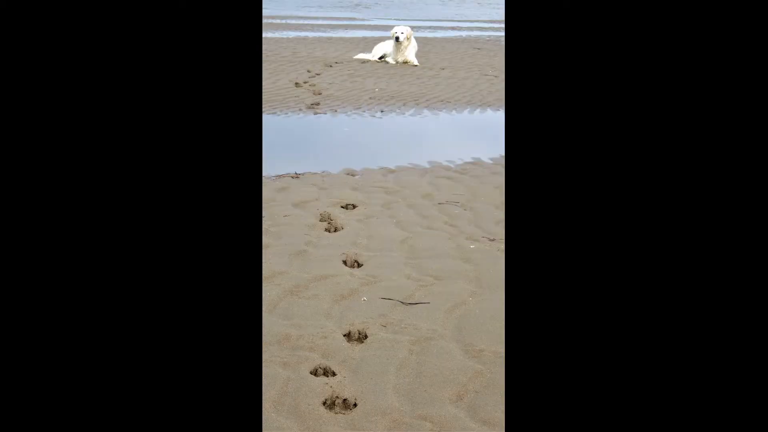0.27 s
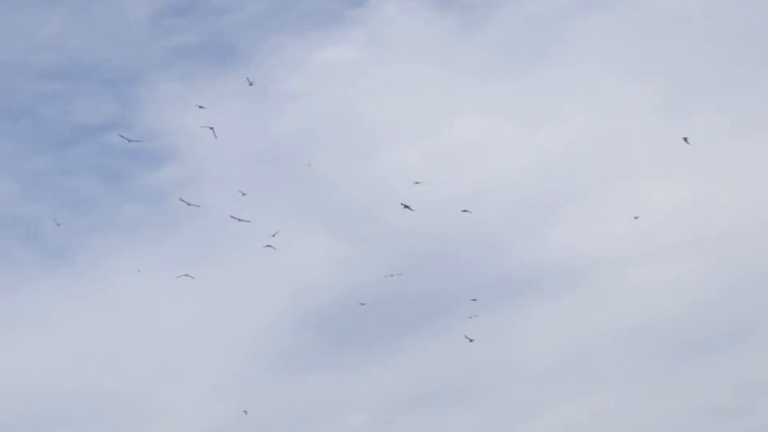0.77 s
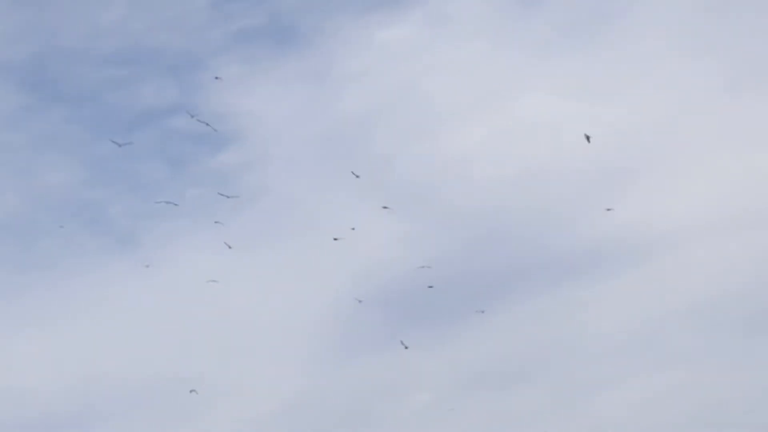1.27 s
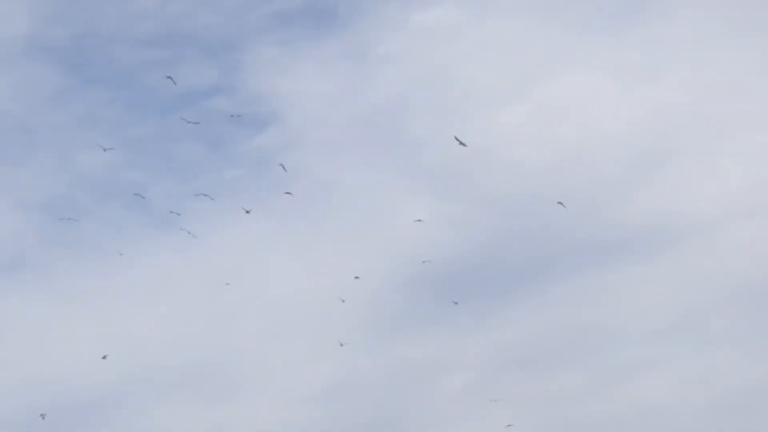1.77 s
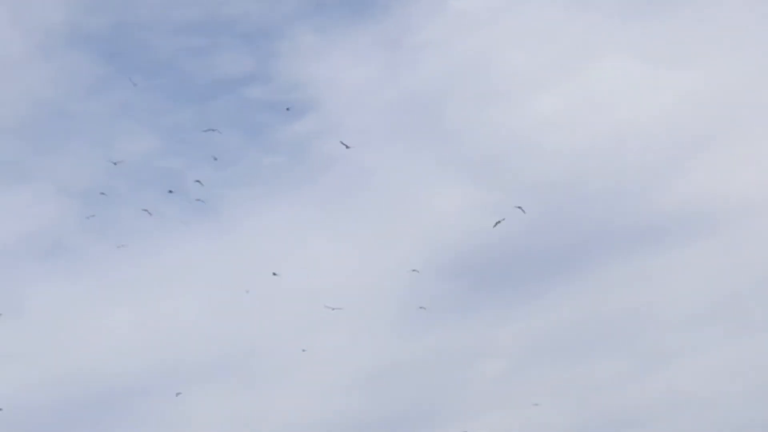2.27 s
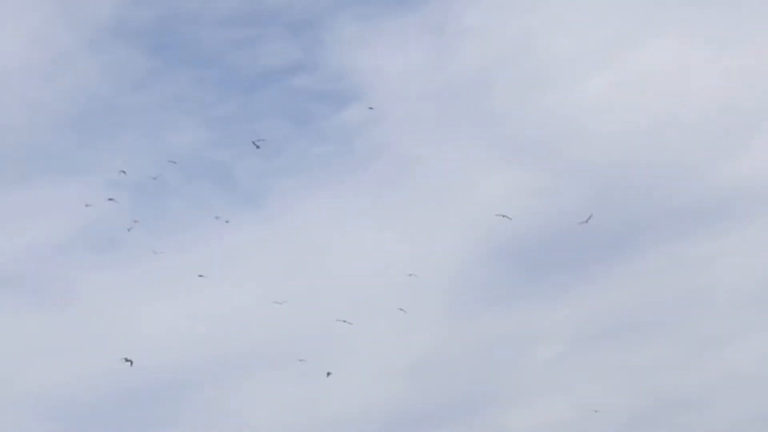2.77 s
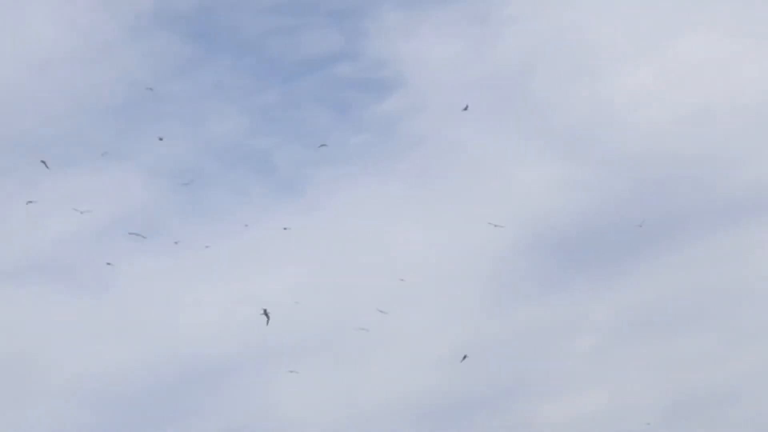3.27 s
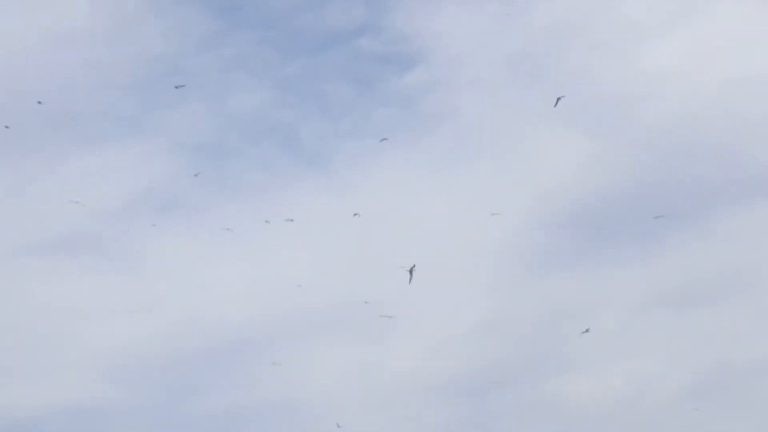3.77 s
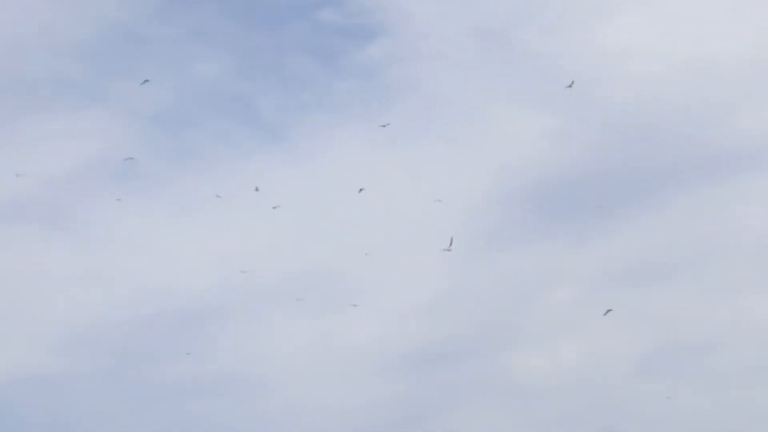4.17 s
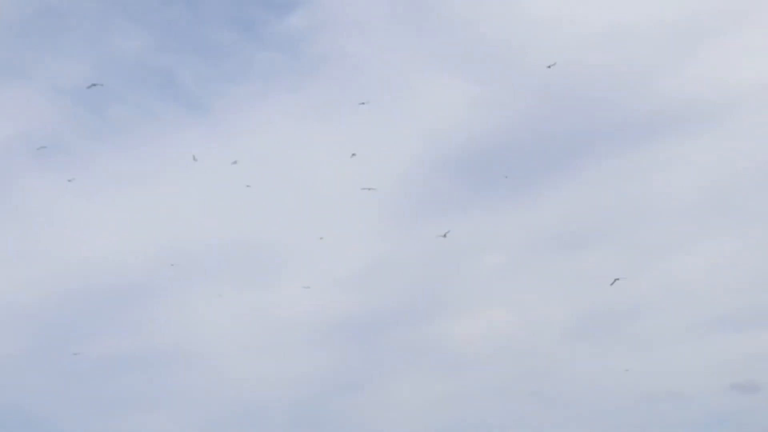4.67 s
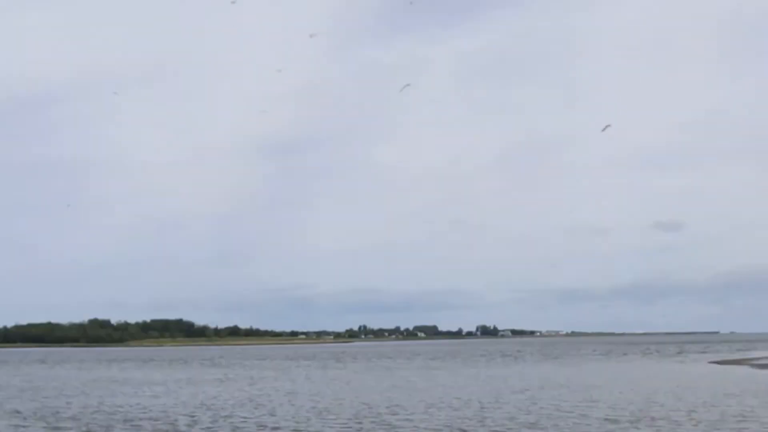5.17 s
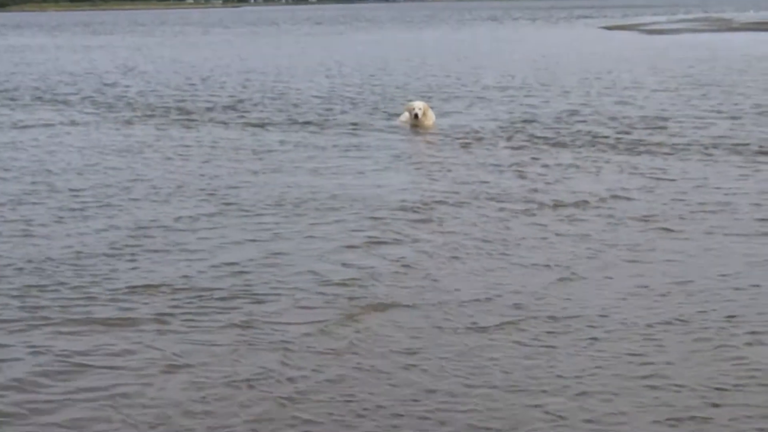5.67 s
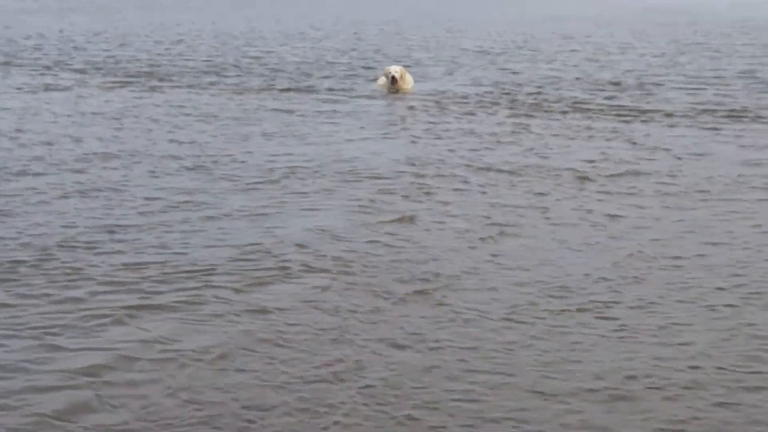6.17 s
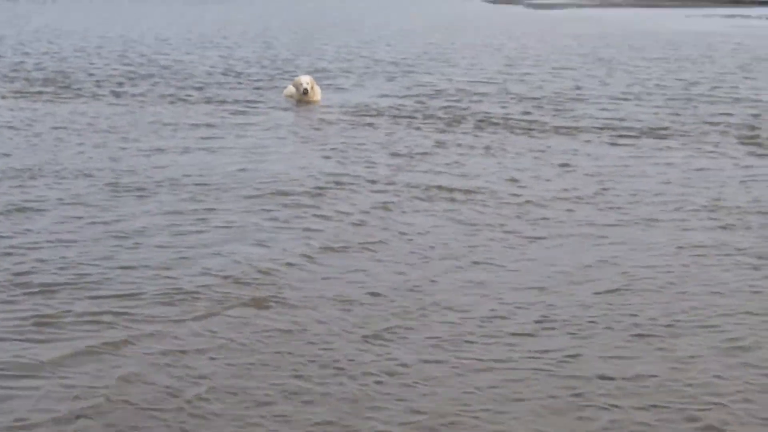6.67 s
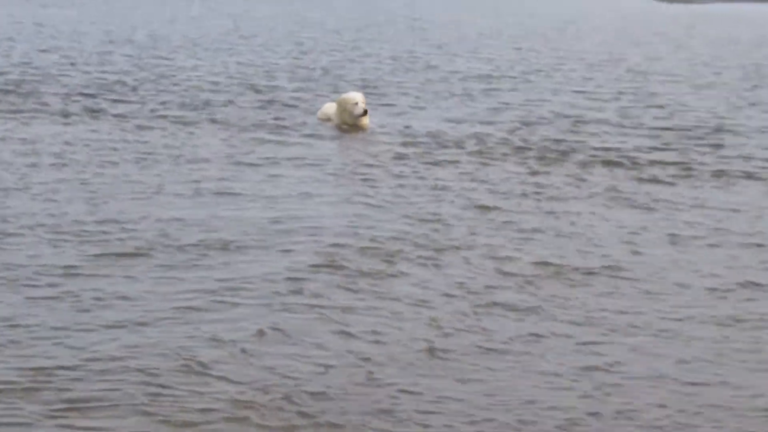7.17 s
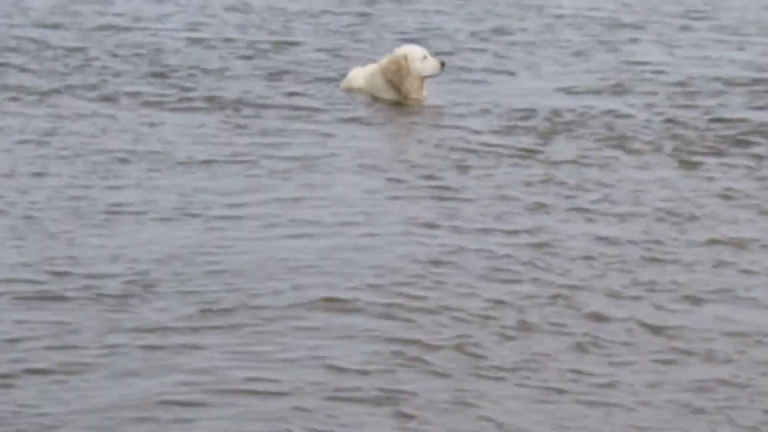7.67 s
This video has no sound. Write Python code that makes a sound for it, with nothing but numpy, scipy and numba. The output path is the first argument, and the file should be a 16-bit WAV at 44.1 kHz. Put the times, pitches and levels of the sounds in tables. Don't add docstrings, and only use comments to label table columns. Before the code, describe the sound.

Terns cry and yap over light wind and hiss, then legs wade through shallow water with gurgling bubbles, crackling foam and one hard clipped slap.

```python
import sys
import numpy as np
from scipy import signal
from scipy.fft import rfft, irfft
from scipy.io import wavfile
from scipy.ndimage import uniform_filter1d
from numba import njit

SR = 44100
rng = np.random.default_rng(int(sys.argv[2]) if len(sys.argv) > 2 else 0)


def amplitude_ratio(level_db):
    exponent = np.asarray(level_db, float) / 20
    return 10 ** exponent


def materialize(psi):
    bounded = np.clip(np.atleast_2d(psi).T, -1, 1)
    quanta = np.round(bounded * 32767).astype(np.int16)
    wavfile.write(sys.argv[1], SR, quanta)


N = 349272
T = np.arange(N) / SR

# time in seconds, level in dB.
WIND = [(.36, -36.5), (1.31, -38.5), (1.8, -39.5), (2.1, -39), (3.3, -37.5), (4.6, -38.5), (4.8, -29.5),
        (5.55, -32), (5.7, -37.5), (6.199, -27.5), (6.451, -22.5), (6.76, -34.5), (7.01, -44), (7.92, -40)]
# frequency in Hz, density in dB per Hz.
AIR_COLOUR = [(20, -4), (190, -5), (500, -3.5), (2400, -15.5), (4500, -21.5), (6500, -12.5), (14500, -10.5),
              (16500, -14)]
# start in seconds, length in seconds, pitch in Hz, level in dB, final fall as a share.
KIPS = [(0.375, 0.056, 1820, -21.5, 0.33), (0.985, 0.014, 1875, -27, 0.28), (1.361, 0.059, 1927, -20, 0.24),
        (2.009, 0.015, 1900, -29.5, 0.63), (2.369, 0.06, 1896, -22, 0.29),
        (3.308, 0.064, 1854, -22.5, 0.31), (3.658, 0.016, 1994, -25, 0.088), (4.145, 0.054, 1838, -26, 0.3),
        (4.732, 0.0065, 1920, -27.5, .1), (4.875, 0.041, 1868, -26.5, 0.18),
        (5.331, 0.013, 1980, -27.5, 0.077), (6.93, 0.067, 1910, -39.5, .1),
        (6.761, 0.057, 1860, -26.5, 0.1), (7.314, 0.054, 1960, -37.5, 0.2),
        (7.699, 0.042, 1930, -28.5, .15)]
# start in seconds, length in seconds, pitch in Hz, level in dB, final fall as a share.
PEEPS = [
    (2.25, 0.028, 2300, -29, 0.049),
]
KIP_HARMONICS = [-13.5, 0.5, -5, -18, -25, -24]
PEEP_HARMONICS = [-5, -17]
# throb rate in Hz and a throb start in seconds, then rows of
# time in seconds, pitch in Hz, level in dB, roughness from 0 to 1, brightness in dB.
CRIES = [
    ((52, .509), [(.35, 1480, -25.5, 0.24, -5.5), (.44, 1425, -24, 0.27, -13), (.49, 1395, -25, 0.2, -14), (.51, 1200, -30, 0.6, -7), (.63, 1185, -31, 0.65, -9), (.75, 1200, -31, 0.6, -8), (.9, 1215, -32, 0.6, -9)]),
    ((88, 1.84), [(1.825, 1185, -54, .3, 12), (1.95, 1160, -54, .35, 12), (2.04, 1100, -58, .4, 12), (2.14, 1000, -54, .3, 12)]),
    ((70, 1.84), [(1.83, 2360, -37, .09, -14), (1.95, 2320, -37, .1, -14), (2.03, 2330, -43, .14, -14), (2.12, 2300, -48, .2, -14)]),
    ((52.8, 5.203), [(5.08, 1520, -38, .06, -17), (5.17, 1420, -31, .06, -17), (5.22, 1375, -27, .06, -17), (5.28, 1390, -30, .06, -17), (5.33, 1400, -38, .1, -17)]),
    ((52, .395), [(.36, 1230, -40, .6, -8), (.45, 1190, -38, .6, -8), (.52, 1150, -42, .6, -8)]),
    ((52.6, 1.996), [(1.89, 1545, -40, .06, -17), (2.0, 1450, -30, .06, -17), (2.08, 1425, -29, .06, -17), (2.11, 1430, -37, .15, -12), (2.15, 1270, -37, .15, -12)]),
]
# throb rate in Hz and a throb start in seconds, then rows of
# time in seconds, pitch in Hz, level in dB, roughness from 0 to 1, brightness in dB.
CHORUS = [
    ((59, 2.2), [(2.43, 1168, -42.5, 0.31, 2), (2.53, 1140, -51.5, 0.26, 10)]),
    ((43, 3), [(2.67, 1714, -38, 0.02, -5), (2.78, 1675, -30, 0.13, -13), (2.83, 1640, -38, 0.1, -14)]),
    ((48, 3), [(2.82, 3020, -42, 0.09, -20), (2.87, 3040, -37, 0.07, -20), (3.02, 3300, -48, .03, -20)]),
    ((65, 2.6), [(2.6, 1168, -47, 0.465, 2), (2.75, 1120, -45, 0.44, 8), (2.95, 1147, -51, 0.48, 4.9), (3.12, 1182, -44, 0.63, 7)]),
    ((54.6, 3.062), [(2.58, 1217, -42, 0.58, -9), (2.66, 1113, -40.5, 0.61, 3.5), (2.83, 1043, -41, 0.57, 4.5), (3.05, 1102, -37, 0.54, 0.5), (3.14, 1113, -35.5, 0.64, -7), (3.23, 1148, -38.5, 0.72, -9), (3.28, 1180, -33, 0.61, 0), (3.65, 1171, -39.5, 0.78, -13)]),
]
CRY_HARMONICS = [-19, 0, 0, -4, -12]
# start in seconds, length in seconds, first pitch in Hz, top level in dB, throb rate in Hz.
TRILLS = [
    (7.25, .11, 1400, -41, 52),
    (4.95, 0.14, 2100, -35, 49.6),
    (3.67, 0.26, 1545, -33, 52.3),
    (6.2, 0.12, 1715, -34, 43),
    (5.88, 0.087, 1734, -33, 63),
    (7.42, 0.21, 2340, -38.5, 24),
    (7.72, 0.13, 2330, -34.5, 46.4),
]
# start in seconds, push in dB, push length in seconds, ring in dB.
SLAPS = [
    (0.582, -41, 0.0072, -21.5),
    (3.417, -13, 0.011, -12.5),
    (4.752, -15.5, 0.006, -27),
    (6.222, -8, 0.011, -24),
    (6.303, -17, 0.0096, -16),
    (6.821, -8, 0.0066, 3),
    (7.904, -57, 0.006, -11),
]
# start in seconds, level in dB, length in seconds.
CRACKS = [
    (6.8243, 7, 0.0021),
]
# time in seconds, peak in dB.
TICKS = [(2.432, -22), (3.894, -25), (4.302, -29), (4.352, -24), (3.589, -26), (3.766, -28), (4.2667, -28),
         (4.4088, -24), (4.436, -19.5), (4.703, -24), (4.7994, -20), (5.202, -14.5), (5.2656, -26),
         (5.281, -16), (5.533, -30), (5.687, -20), (5.807, -24), (6.006, -22.5), (6.248, -23),
         (6.4735, -36), (6.4963, -19), (6.5454, -21), (6.601, -19), (6.7303, -21), (6.7664, -12.5),
         (6.8227, -28), (7.235, -23), (7.4857, -20.5), (7.631, -21), (7.7634, -18), (7.9097, -18.5)]
# start in seconds, length in seconds, splash in dB, spray in dB.
STRIDES = [(5.72, 0.029, -40, -56), (5.923, 0.03, -36, -53), (6.118, 0.045, -38, -58),
           (4.6, 0.052, -39, -62), (3.455, 0.14, -32.5, -46), (3.581, 0.15, -34, -50.5),
           (3.749, 0.18, -33, -45.5), (3.949, 0.075, -38.5, -51), (4.06, 0.24, -42, -53.5),
           (4.317, 0.19, -36, -43), (4.496, 0.15, -38, -59), (4.706, 0.036, -32, -41),
           (4.773, 0.096, -29, -45.5), (4.917, 0.14, -25, -41), (5.108, 0.075, -35, -39.5),
           (5.208, 0.1, -31.5, -39.5), (5.324, .17, -33, -43.5), (5.533, 0.059, -28.5, -42.5),
           (5.611, 0.095, -23, -42), (5.773, 0.15, -27.5, -40.5), (5.974, 0.15, -30.5, -47),
           (6.189, 0.23, -32.5, -40), (6.444, 0.063, -32.5, -44), (6.499, 0.098, -22, -42.5),
           (6.627, 0.19, -23, -41.5), (6.873, 0.15, -33, -53), (7.06, 0.22, -37.5, -47),
           (7.349, 0.061, -33.5, -47.5), (7.443, 0.21, -32.5, -42.5), (7.686, 0.04, -27, -45),
           (7.764, 0.12, -33, -42.5)]
# start in seconds, length in seconds, level in dB.
SLOSHES = [(3.417, 0.013, -25), (3.594, 0.36, -36.5), (3.85, 0.29, -33), (4.301, 0.26, -26.5),
           (4.596, 0.076, -23.5), (4.79, 0.11, -32), (5.04, 0.038, -23), (5.106, 0.19, -27.5),
           (5.32, 0.095, -26), (5.453, 0.14, -20), (5.663, 0.034, -22), (5.81, 0.1, -25.5),
           (5.986, 0.13, -15.5), (6.184, 0.2, -32), (6.473, 0.099, -12), (6.653, 0.28, -36),
           (7.214, 0.02, -38.5), (7.39, 0.027, -43), (7.507, 0.31, -33.5), (7.898, .02, -22.5), ]
# start in seconds, peak in dB, pitch in Hz.
GULPS = [(4.335, -16, 507), (4.39, -21, 453), (4.63, -16, 400), (5.064, -10.5, 430), (6.012, -9, 338),
         (6.06, -4.5, 320), (6.084, -5.5, 430), (6.11, -13, 381), (6.575, -4, 417), (7.905, -14, 394),
         (3.423, -10, 301), (3.741, -4, 567), (3.888, -11.5, 625), (4.198, -17, 380), (4.442, -16.5, 405),
         (4.606, -15.5, 368), (4.757, -1, 352), (5.032, -12, 342), (5.155, -18, 270), (5.228, -13.5, 402),
         (5.334, -13, 352), (5.392, -10, 450), (5.465, -12.5, 379), (5.553, -3, 390), (5.589, -4.5, 490),
         (5.844, -13, 530), (5.993, -7, 358), (6.041, -2, 300), (6.142, -13, 420), (6.216, -9, 421),
         (6.267, -14, 393), (6.301, -4, 350), (6.343, -7, 445), (6.479, -14, 380), (6.499, -2, 353),
         (6.508, -5, 372), (6.53, -5, 400), (6.559, -6.5, 464), (6.763, -12.5, 513), (6.826, 2, 435),
         (6.958, -20, 517), (7.382, -16, 350)]
# start in seconds, peak in dB, pitch in Hz.
BUBBLES = [(2.97, -23.5, 1030), (3.399, -20, 1210), (3.599, -24, 624), (3.978, -19, 673),
           (4.709, -19.5, 582), (4.805, -15, 840), (4.938, -12.5, 1020), (5.099, -25, 743),
           (5.228, -13, 640), (5.276, -18, 750), (5.646, -16, 1020), (5.766, -14, 1130), (6.303, -17, 603),
           (6.48, -9, 665), (6.585, -13, 558), (7.245, -22, 567), (7.324, -24, 850), (7.376, -22, 910),
           (7.53, -21, 974), (3.633, -16, 860), (4.53, -15, 1020), (7.762, -22.5, 830), (4.502, -14.5, 990),
           (5.581, -8.5, 1080), (5.686, -4.5, 930), (5.791, -13.5, 1200), (5.845, -6.5, 1150),
           (6.445, -13.5, 1030), (6.552, -6.5, 930), (6.697, -9, 894), (6.759, -8, 825), (6.96, -17.5, 895),
           (7.701, -15, 900)]
# start in seconds, peak in dB, pitch in Hz.
DROPS = [(3.588, -13, 2540), (3.633, -13, 2250), (3.654, -17, 1930), (3.764, -19, 2400), (3.832, -19, 2800),
         (3.9845, -14.5, 4270), (4.05, -19, 2470), (4.199, -16, 2600), (4.422, -26, 1890),
         (4.527, -18, 1700), (4.6245, -16, 1580), (4.71, -14, 2640), (4.967, -9, 2660), (5.333, -9, 4400),
         (5.58, -17, 2170), (5.626, -14, 1850), (5.833, -19, 2090), (5.9635, -18, 2600), (6.004, -14, 2040),
         (6.067, -25, 1600), (6.219, -27, 1780), (6.446, -17, 1480), (6.495, -3.5, 4400),
         (6.548, -14, 2530), (6.91, -20, 2040), (6.959, -17, 2160), (6.979, -15, 1730), (7.003, -17, 2320),
         (7.474, -21, 2570), (7.675, -19, 2150), (7.762, -12, 2550), (7.763, -12, 3600), (7.6, -11.5, 4600),
         (7.63, -17, 1320), (3.516, -14.5, 1176), (3.54, -11, 2400), (4.198, -22, 1420),
         (4.33, -15.5, 1520), (4.825, -3, 2280), (4.851, -4.5, 1400), (4.868, -10.5, 1650),
         (4.921, -10, 1610), (5.006, -14.5, 1410), (5.249, -17, 1260), (5.369, -12.5, 2370),
         (5.432, -11, 1245), (5.541, -5, 1330), (5.753, -11, 2240), (5.828, -13, 1310), (6.578, -8.5, 1310),
         (6.67, -9, 1330), (6.736, -9, 1440), (7.113, -19.5, 1190), (7.561, -11.5, 2380),
         (7.575, -15, 2650)]
# start in seconds, peak in dB, first pitch in Hz, last pitch in Hz, length in seconds.
RISERS = [
    (3.748, -21, 619, 1706, 0.053),
    (5.544, -14, 650, 900, 0.036),
    (6.35, -19.5, 600, 900, 0.049),
    (6.59, -15, 520, 900, .04),
    (7.056, -29.5, 597, 1400, .075),
    (7.656, -25, 397, 700, 0.033),
]
# centre in Hz, width in Hz, gain in dB.
CASE = [(3150, 400, -20), (5450, 900, -5), (7800, 1100, -4), (5130, 170, -15), (5720, 300, -13),
        (4080, 100, -20), (7150, 220, -13), (8170, 35, -8)]
FADES = [.444, .655, .77, .935, 1.328, 1.421, 1.665, 1.861, 2.677, 3.138, 3.297, 3.486, 3.555, 3.79, 3.927,
         4.02, 4.392, 4.487, 5.045, 6.11, 7.551, 7.711]

CAVITY_HZ, CAVITY_T60_S = 392, .05
RISE_DB_S, SPLASH_FALL_DB_S, SPRAY_FALL_DB_S, SLOSH_FALL_DB_S = 902, 416, 312, 402
RUMBLE_DB = -16
AIR_DB = -35
RASP = 2.1
CRY_ATTACK_S, LEAN_DB = 0.018, 4.5
TRILL_EDGE_DB, TRILL_ROUGH, TRILL_BRIGHT_DB = -7, 0.077, -17
SAG_PER_S2, SAG_AT, REGAIN = 1.2, 0.46, .9
CRACKLE_DB, CRACKLE_STEEP = -5.5, 1.212
SHELF_HZ, SHELF_DB = 5100, -10
TOP_HZ, START_S = 15800, 0.3595


def unit(x):
    return x / np.sqrt(np.mean(x ** 2))


def band(x, lo_hz, hi_hz, order=2):
    return signal.sosfilt(signal.butter(order, [lo_hz, hi_hz], "band", fs=SR, output="sos"), x)


def colour(x, db_of_hz, size=4096):
    hz = np.arange(size // 2 + 1) * SR / size + 1
    c = irfft(db_of_hz(hz) * np.log(10) / 20)
    c[1:size // 2] *= 2
    c[size // 2 + 1:] = 0
    return signal.fftconvolve(x, irfft(np.exp(rfft(c))))[:N]


def walk(rate):
    k = int(SR / rate)
    held = np.repeat(rng.standard_normal(N // k + 1), k)
    return 1.35 * uniform_filter1d(uniform_filter1d(held, k), k)[:N]


def swells(s, length, db, fall_db_s):
    gain = np.zeros(N)
    for start, hold, level in zip(s, length, db):
        rise = RISE_DB_S * (T - start)
        fall = fall_db_s * (start + hold - T)
        gain += amplitude_ratio(level + np.minimum(0, np.minimum(rise, fall)))
    return gain


@njit
def ring(s, hz, t60, glide, size, rise):
    y = np.zeros(N)
    for k in range(len(s)):
        i, n, phase = int(s[k] * SR), t60[k] * SR + 2, 0.
        for j in range(min(int(n), N - i)):
            phase += 2 * np.pi * min(hz[k] * (1 + glide[k] * j / n), .45 * SR) / SR
            attack = 1 - np.exp(-j * hz[k] / (rise * SR))
            y[i + j] += size[k] * np.sin(phase) * 10 ** (-3 * j / n) * attack
    return y


def wind():
    s, db = np.transpose(WIND)
    gust = amplitude_ratio(np.interp(T, s, db))
    gust = gust + amplitude_ratio(RUMBLE_DB) * swells(*np.transpose(SLOSHES), SLOSH_FALL_DB_S)
    gust = gust * amplitude_ratio(3.6 * walk(25))
    noise = rng.standard_normal((2, N))
    rumble = unit(band(noise[0], 24.5, 102.0, order=1))
    cavity = amplitude_ratio(-8.5 + 2 * walk(29)) * unit(band(noise[1], 379, 428, order=1))
    return gust * (rumble + cavity)


def air():
    hz, db = np.transpose(AIR_COLOUR)
    hiss = unit(colour(rng.standard_normal(N), lambda f: np.interp(np.log(f), np.log(hz), db)))
    after = T - CRACKS[0][0]
    duck_db = -8 * (after > 0) * np.exp(-np.maximum(after, 0) / 1.2)
    return hiss * amplitude_ratio(AIR_DB - 1.5 + duck_db + 1.0 * walk(4.48))


def stack(hz, harmonics_db, bright_db):
    phase = 2 * np.pi * np.cumsum(hz) / SR
    return sum(amplitude_ratio(db + bright_db * (k > 1)) * np.sin((k + 1) * phase) for k, db in enumerate(harmonics_db))


def cry(throb, rows, shake):
    out = np.zeros(N)
    throb_hz, throb_s = throb
    s, *columns = np.transpose(rows)
    a, b = int(s[0] * SR), int(s[-1] * SR)
    t = T[a:b]
    flutter, grain, drift = shake[:, a:b]
    hz, db, rough, bright_db = (np.interp(t, s, c) for c in columns)
    u = ((t - throb_s) * throb_hz + .16 * rough * shake[2, ::-1][a:b]) % 1
    duty = np.minimum(.58 + .5 * rough, .9)
    gate = np.sin(np.pi * np.clip(u / duty, 0, 1)) ** .8
    sag = (.07 - .08 * rough) * (u - .35)
    pitch = hz * (1 - sag + .17 * rough * flutter + .03 * rough * drift)
    gate = gate * amplitude_ratio(rough * (3 * grain + 2.5 * drift))
    gate = gate * amplitude_ratio(LEAN_DB * rough * flutter)
    attack = np.minimum((t - s[0]) / CRY_ATTACK_S, 1)
    out[a:b] = amplitude_ratio(db + 7.0) * attack * gate * stack(pitch, CRY_HARMONICS, bright_db)
    return out


def kip(s, length, hz, db, fall, harmonics_db, shake):
    out, i = np.zeros(N), int(s * SR)
    u = np.arange(int(length * SR)) / (length * SR)
    end = np.clip((u - .62) / 0.288, 0, 1)
    wobble = 0.093 * end * shake[1, i:i + len(u)]
    pitch = hz * (1 - .5 * (u - .33) ** 2 - fall * end ** 1.18 + wobble)
    shape = np.clip(u * 12, 0, 1) * np.clip((1 - u) * 3, 0, 1)
    shape = shape * (1 + 0.029 * np.sin(85 * 2 * np.pi * length * u))
    rasp = 1 + RASP * (np.exp(-u * length / 0.0046) + end) * rng.standard_normal(len(u))
    voice = uniform_filter1d(rasp, size=9) * stack(pitch, harmonics_db, 8 * end)
    out[i:i + len(u)] = amplitude_ratio(db + 2.0 - 3.3 * end) * shape * voice
    return out


def trill(s, length, hz, db, throb_hz, shake):
    sag = SAG_PER_S2 * length ** 2
    shares = [0, SAG_AT / 2, SAG_AT, 1]
    drops = [0, .6, 1, 1 - REGAIN]
    edges = [0.84, 0.0, 0, 0.41]
    rows = [(s + length * u, hz * (1 - sag * drop), db + TRILL_EDGE_DB * edge, TRILL_ROUGH, TRILL_BRIGHT_DB)
            for u, drop, edge in zip(shares, drops, edges)]
    return cry((throb_hz, s), rows, shake)


def terns():
    shake = np.array([unit(band(rng.standard_normal(N), 60, 420)) for _ in range(2)] + [walk(52)])
    membrane = np.sin(2 * np.pi * np.cumsum(252 + 12 * walk(9)) / SR)
    shake[0] = .2 * shake[0] + 1.3 * membrane
    calls = sum(kip(*k, KIP_HARMONICS, shake) for k in KIPS)
    calls += sum(kip(*k, PEEP_HARMONICS, shake) for k in PEEPS)
    calls += sum(cry(*c, shake) for c in CRIES) + sum(cry(*c, shake) for c in CHORUS)
    calls += sum(trill(*c, shake) for c in TRILLS)
    t = T[:SR // 5]
    echo = rng.standard_normal(len(t)) * np.exp(-t / .02) * (t > .004)
    return calls + amplitude_ratio(-10.5) * signal.fftconvolve(calls, echo / np.linalg.norm(echo))[:N]


def slaps():
    out = np.zeros(N)
    for s, push_db, length, ring_db in SLAPS:
        u = np.clip((T - s) / length, 0, 3)
        out += amplitude_ratio(push_db) * 2.3 * np.sin(2 * np.pi * u) * np.exp(-1.3 * u) * (u < 3)
        out += ring(np.array([s + 0.475 * length]), np.array([1. * CAVITY_HZ]), np.array([CAVITY_T60_S]),
                    np.zeros(1), amplitude_ratio(np.array([ring_db + 2.0])), 0.5)
    s, db, length = CRACKS[0]
    gate = np.sin(np.pi * np.clip((T - s) / length, 0, 1))
    snap = band(rng.standard_normal(N), 11000, 15000)
    body = band(rng.standard_normal(N), 2700, 5400)
    return out + amplitude_ratio(db) * gate * unit(snap + 0.8 * body)


def ticks():
    clicks = np.zeros(N)
    for s, db in TICKS:
        clicks[int(s * SR)] = amplitude_ratio(db)
    tick = rng.standard_normal(200) * np.exp(-T[:200] / 0.00097)
    return amplitude_ratio(12) * band(signal.fftconvolve(clicks, tick)[:N], 4100, 10900, order=3)


def swarm(count, lo_hz, hi_hz, cycles, glide, spread_db, rise):
    u = rng.random((count, 5)).T
    hz = lo_hz * (hi_hz / lo_hz) ** u[1]
    size = amplitude_ratio(spread_db * np.minimum(-np.log(1 - u[2]), 3))
    t60 = cycles * (0.15 + 1.9 * u[3]) / hz
    return unit(ring(u[0] * N / SR, hz, t60, glide * u[4] * 2, size, rise))


def sloshing():
    slosh = swells(*np.transpose(SLOSHES), SLOSH_FALL_DB_S)
    bubbles = swarm(count=1300, lo_hz=297.0, hi_hz=503.0, cycles=26.4, glide=0.373, spread_db=5.5, rise=0.79)
    hum = unit(band(rng.standard_normal(N), 327, 452, order=1))
    return slosh * (amplitude_ratio(-5.5 + 1.05 * walk(25)) * bubbles + amplitude_ratio(-12.0 + 2 * walk(30)) * hum)


def splashing():
    s, length, splash_db, spray_db = np.transpose(STRIDES)
    splash = swells(s, length, splash_db, SPLASH_FALL_DB_S)
    spray = swells(s, length, spray_db, SPRAY_FALL_DB_S)
    crackle = amplitude_ratio(CRACKLE_DB) * splash ** CRACKLE_STEEP
    clump = amplitude_ratio(2.4 * walk(40))
    noise = rng.standard_normal((2, N))
    bubbles = swarm(count=9000, lo_hz=522.0, hi_hz=2470, cycles=21.8, glide=0.446, spread_db=4.5, rise=0.43)
    wash = unit(band(noise[0], 530, 2350, order=1))
    out = splash * (amplitude_ratio(-1.5) * bubbles + amplitude_ratio(-7.5) * wash)
    foam = swarm(count=16000, lo_hz=1774, hi_hz=5350, cycles=14.4, glide=0.65, spread_db=6.0, rise=19.0)
    fizz = unit(band(noise[1], 3860, 4750))
    out += crackle * (amplitude_ratio(7.5) * foam + amplitude_ratio(-0.5) * fizz)
    spatter = swarm(count=9000, lo_hz=5600, hi_hz=11500, cycles=7, glide=.1, spread_db=2.8, rise=.8)
    out += spray * amplitude_ratio(9.5 + 2.54 * walk(70)) * band(spatter, 6000, 12000)
    return clump * out


def listed(table, cycles, glide, gain_db, rise):
    s, db, hz = np.array(table, float).T
    u = rng.random((len(s), 2)).T
    return ring(s, hz, cycles * (1.0 + 0.48 * u[0]) / hz, glide * 2 * u[1], amplitude_ratio(db + gain_db), rise)


def water():
    out = ticks() + sloshing() + splashing()
    out += listed(GULPS, cycles=11.6, glide=0.12, gain_db=3.34, rise=0.72)
    out += listed(BUBBLES, cycles=20.4, glide=0.515, gain_db=1.16, rise=0.55)
    return out + listed(DROPS, cycles=22, glide=0.35, gain_db=2.43, rise=1.1)


def risers():
    s, db, first_hz, last_hz, length = np.array(RISERS, float).T
    return ring(s, first_hz, 4 * length, 4 * (last_hz / first_hz - 1), amplitude_ratio(db), 2.5)


def scene():
    return (wind() + air() + terns() + slaps() + water() + risers())[None]


def case_db(f):
    notches = sum(db / (1 + (2 * (f - hz) / width) ** 2) for hz, width, db in CASE)
    return notches + SHELF_DB / (1 + (SHELF_HZ / f) ** 12)


def roll_off(x):
    return signal.sosfilt(signal.butter(12, 16820, fs=SR, output="sos"), x)


def record(dry):
    x = colour(dry[0], case_db)
    x = np.clip(x, -.66, .66)
    fade_db = sum(-18 * np.exp(-((T - s) / .006) ** 2) for s in FADES)
    high = signal.sosfiltfilt(signal.butter(6, 5000, "high", fs=SR, output="sos"), x)
    x = x - high * (1 - amplitude_ratio(fade_db))
    x = signal.sosfilt(signal.ellip(8, .2, 60, TOP_HZ, fs=SR, output="sos"), x)
    x = x * (T > START_S)
    return roll_off(x[None])


dry = scene()
out = record(dry)
materialize(out)
```